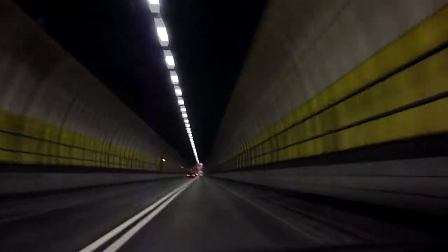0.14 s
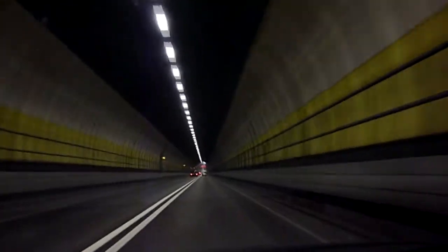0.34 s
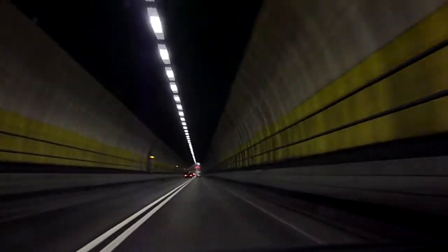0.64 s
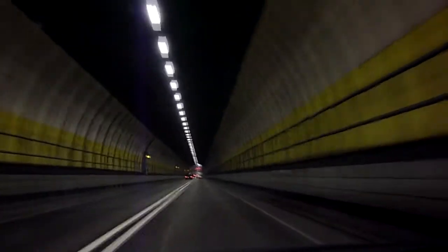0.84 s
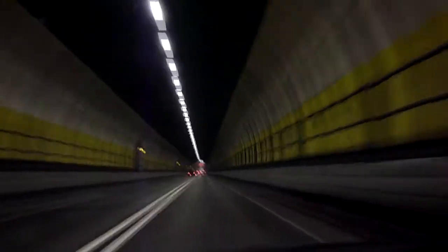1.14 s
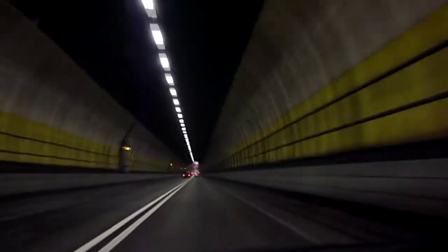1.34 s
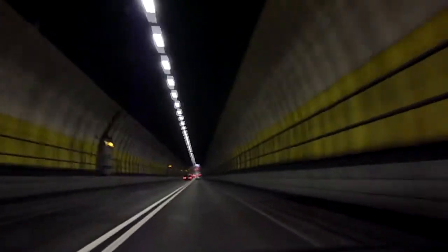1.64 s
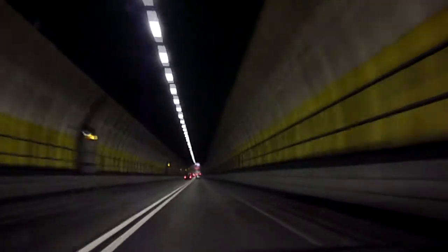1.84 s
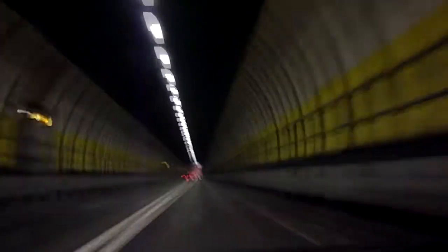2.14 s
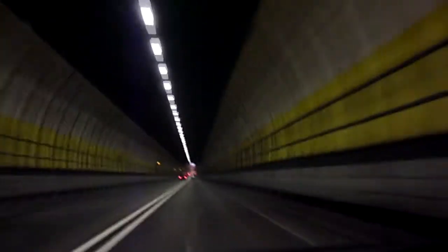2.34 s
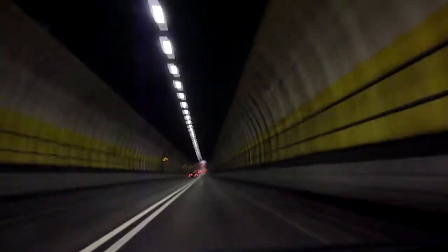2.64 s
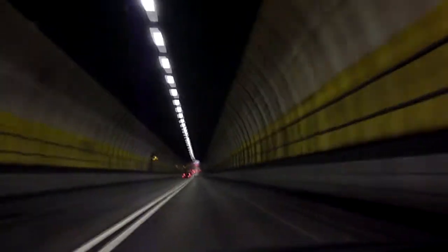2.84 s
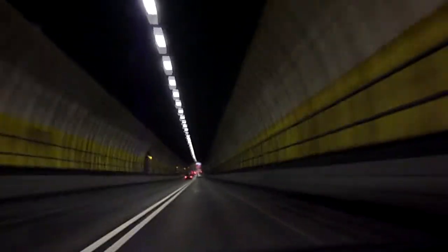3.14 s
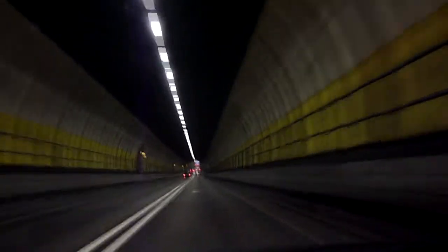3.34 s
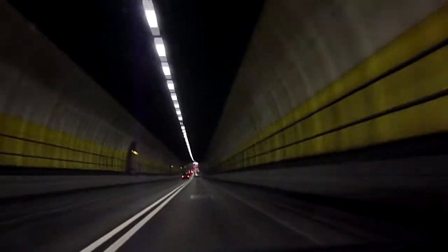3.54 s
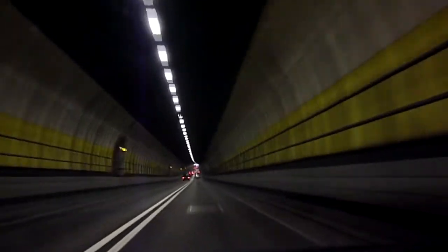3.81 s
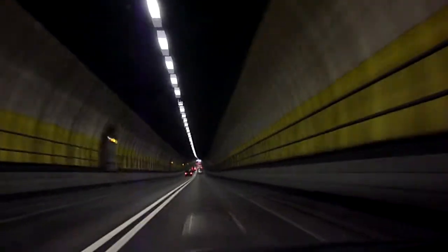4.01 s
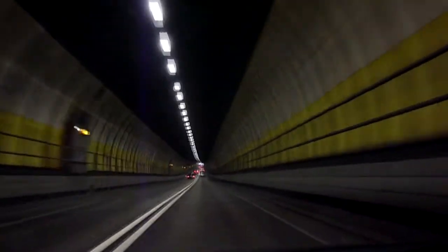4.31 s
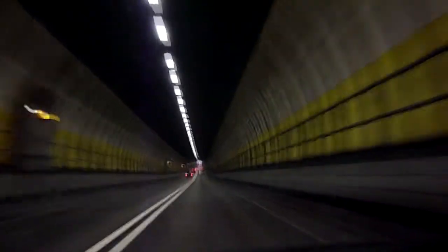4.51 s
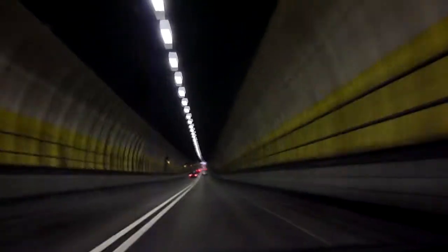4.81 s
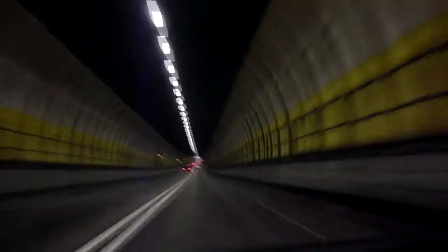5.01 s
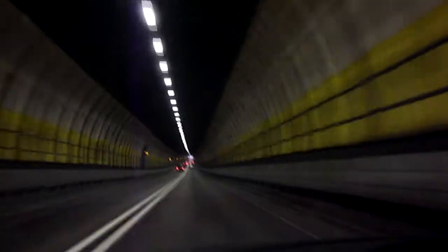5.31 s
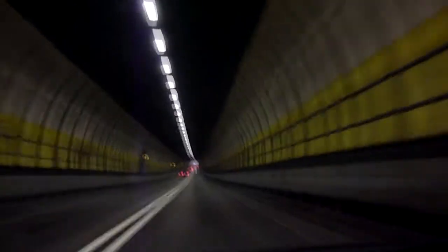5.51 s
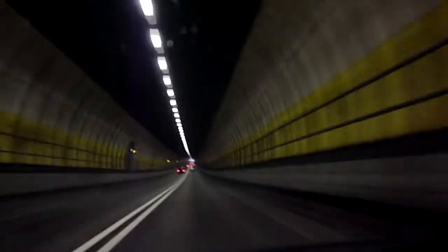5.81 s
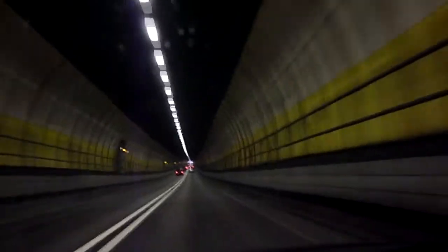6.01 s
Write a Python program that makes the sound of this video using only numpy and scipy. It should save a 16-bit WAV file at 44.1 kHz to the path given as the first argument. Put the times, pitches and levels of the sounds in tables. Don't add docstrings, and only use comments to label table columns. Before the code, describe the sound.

Constant low cabin boom and dull tread roar as a car cruises through a tunnel, with brief swelling hums and tiny plastic rattles.

```python
import sys
import numpy as np
from scipy import signal
from scipy.io import wavfile
from scipy.ndimage import uniform_filter1d

SR = 44100
rng = np.random.default_rng(int(sys.argv[2]) if len(sys.argv) > 2 else 0)


def transcribe(signal):
    frames = np.atleast_2d(signal).T
    limited = np.clip(frames, -1, 1)
    pcm = np.round(limited * 32767).astype(np.int16)
    wavfile.write(sys.argv[1], SR, pcm)


def gain_from_decibels(decibels):
    exponent = np.asarray(decibels, float) / 20
    return 10 ** exponent


N = 271656


def evened(x):
    return x / np.sqrt(np.mean(x ** 2) + 1e-20)


def curve(rows):
    s, db = np.transpose(rows)
    return np.interp(np.arange(N) / SR, s, db)


def swells(rows):
    s, db, length = np.transpose(rows)[:, :, None]
    t = np.arange(0, N + 256, 256) / SR
    bumps = db * np.exp(-((t - s) / length) ** 2)
    return np.interp(np.arange(N) / SR, t, bumps.max(axis=0))


def steadied(x, size, share):
    power = uniform_filter1d(uniform_filter1d(x ** 2, size=size), size=size)
    return evened(x / (power + 1e-6) ** (share / 2))


def coloured(points, patchy_db=0., flicker_db=0., size=1024):
    hop = size // 4
    hz = np.fft.rfftfreq(size, 1 / SR)
    frames = N // hop + 5
    a, b, patches = rng.standard_normal((frames, len(hz), 3)).T
    patches = uniform_filter1d(patches, size=10, axis=0)
    patches = evened(uniform_filter1d(patches, size=12, axis=1))
    flicker = evened(uniform_filter1d(rng.standard_normal(frames), size=4))
    f, db = np.transpose(points)
    colour_db = np.interp(np.log(hz + 1), np.log(f + 1), db, left=-100, right=-100)
    z = (a + 1j * b) * gain_from_decibels(colour_db[:, None] + patchy_db * patches + flicker_db * flicker)
    return evened(signal.istft(z, nperseg=size, noverlap=size - hop)[1][:N])


def ringing(hz, width_hz):
    r = np.exp(-np.pi * width_hz / SR)
    slow = rng.standard_normal(N) + 1j * rng.standard_normal(N)
    slow = signal.lfilter([1], np.convolve([1, -r], [1, -r]), slow)
    return evened((slow * np.exp(2j * np.pi * hz * np.arange(N) / SR)).real)


# t/s, level/dB
WALL_ROAR = [(0, -27), (.2, -28.5), (.42, -27), (.9, -28.5), (1.1, -30.5), (1.38, -27.5), (2.2, -31.5),
             (2.69, -27), (3.33, -29), (3.55, -27), (3.8, -26.5), (3.98, -30), (4.08, -26.5), (4.6, -27),
             (4.72, -29), (5.0, -28.5), (5.5, -26), (6.16, -26.5)]


def roar_db():
    return curve(WALL_ROAR)


def with_roar(share):
    mean_db = -28.5
    return gain_from_decibels(share * (roar_db() - mean_db))


# f/Hz, level/dB
WIND_COLOUR = [(1800, -30), (2600, -1.5), (3500, 0.5), (4400, -5), (5400, -8), (6500, -8.5), (8100, -11.5)]


def wind():
    hiss = coloured(WIND_COLOUR, patchy_db=0.9, flicker_db=.6, size=512)
    return gain_from_decibels(-57.5) * with_roar(1.2) * hiss


# t/s, peak level/dB
TRIM_TICKS = [(0.2374, -59), (1.1872, -54), (1.4044, -55), (1.7225, -60), (2.1161, -55), (2.157, -47),
              (2.1744, -57), (2.2233, -50), (2.2573, -55), (2.2932, -47), (2.3115, -56), (2.4144, -58),
              (2.9734, -55.5), (3.0374, -55), (3.0869, -48.5), (3.1916, -57), (3.5059, -60), (4.6164, -49),
              (4.9377, -58), (5.0649, -57), (5.1552, -40.5), (5.1954, -58), (5.234, -55), (5.2454, -55),
              (5.6654, -57), (5.7463, -51), (5.7514, -49), (5.8167, -55), (5.8476, -54)]


def tick_envelope():
    t = np.arange(3000) / SR
    envelope = np.zeros(N + 3000)
    stutter = 0.9 + .4 * np.cos(2 * np.pi * 420. * t)
    tail = gain_from_decibels(-10 - 60 * t / 0.087)
    onset = np.minimum(t / .0004, 1)
    for s, db in TRIM_TICKS:
        scrape_s = .002 + .0004 * max(db + 50, 0)
        scrape = np.clip((scrape_s - t) / .001 + 1, 0, 1) * stutter
        envelope[round(s * SR):][:len(t)] += gain_from_decibels(db - 3.0) * (scrape + tail) * onset
    return envelope[:N]


# t/s, level over the steady buzz/dB, length/s
LOOSE_SPELLS = [
    (1.2, 1.5, .15),
    (2.22, 4, .13),
    (3.1, 4.5, .12),
    (4.6, 2.5, .05),
    (5.22, 3, .07),
    (5.67, 4, .02),
    (5.8, 2, .07),
]


def buzz_envelope():
    loose_db = swells(LOOSE_SPELLS)
    slips_per_s = 100. * gain_from_decibels(3. * loose_db)
    strength = gain_from_decibels(4. * np.minimum(rng.exponential(1, N), 4))
    slips = strength * (rng.random(N) < slips_per_s / SR)
    decay = gain_from_decibels(-60 * np.arange(800) / SR / .015)
    slips = signal.oaconvolve(slips, decay)[:N]
    return gain_from_decibels(-70 + loose_db) * with_roar(.5) * evened(1 + .15 * slips)


# f/Hz, level/dB
TRIM_COLOUR = [(2500, -26), (4000, -9.5), (5300, -2), (6500, 1), (8100, -5.5)]


def trim():
    plastic = steadied(coloured(TRIM_COLOUR, size=256), size=40, share=.6)
    return np.hypot(tick_envelope(), buzz_envelope()) * plastic


# f/Hz, level/dB
TREAD_COLOUR = [(220, -32.5), (380, -5.5), (478, -5), (984, -5), (2310, -28.5), (2700, -31), (3510, -70.5),
                (5940, -120)]


def tread_roar():
    roar = coloured(TREAD_COLOUR, patchy_db=0.26, flicker_db=1.15)
    return gain_from_decibels(roar_db()) * steadied(roar, size=6000, share=0.66)


# t/s, level over the steady hum/dB, length/s
RIBBED_ROAD = [(.3, 7.5, 0.23), (.56, 12, 0.074), (.8, 10, 0.093), (1.43, 11.5, 0.19), (1.65, 12, 0.12),
               (2.02, 11, 0.17), (2.4, 9, .15), (2.81, 6, .08), (3.05, 13.5, 0.22), (3.3, 13.5, 0.089),
               (3.68, 11, 0.29), (4.0, 7.5, 0.17), (4.58, 10.5, .1), (5.0, 12.5, 0.34), (5.23, 15, 0.13),
               (5.5, 10.5, 0.13), (5.8, 6, 0.17), (6.14, 12, .1)]


def tyre_hum():
    air_ring = ringing(253, width_hz=8.2)
    return gain_from_decibels(-36.5 + swells(RIBBED_ROAD)) * steadied(air_ring, size=3000, share=.8)


# t/s, level over the steady heave/dB, length/s
ROAD_DIPS = [
    (.3, 3.5, 0.26),
    (1., 4, 0.17),
    (2.1, 3.5, 0.31),
    (2.33, 5, 0.13),
    (3.35, 3, 0.32),
    (4.1, 3, 0.12),
    (4.5, 6, 0.18),
    (4.9, 2.5, 0.13),
    (5.4, 3, 0.28),
    (5.87, 2.5, .15),
]
# f/Hz, level/dB
HEAVE_COLOUR = [(8, -32.5), (20, -21.5), (32, -4), (42, -4.5), (49, -0.5), (57, -1.5), (64, -3.5),
                (73, -5.5), (95, -10.5), (130, -32)]


def heave():
    rocking = steadied(coloured(HEAVE_COLOUR, size=8192), size=5000, share=0.53)
    return gain_from_decibels(-33.5 + swells(ROAD_DIPS)) * rocking


# t/s, level/dB
ROAD_SHAKE = [(0, -18), (.2, -17.5), (.4, -18.5), (.55, -17), (.75, -18), (1., -17), (1.3, -18.5),
              (1.7, -16.5), (2.3, -17), (2.55, -20.5), (3.09, -16), (3.55, -19.5), (3.9, -16), (4.2, -18.5),
              (4.58, -16), (5.25, -20), (5.68, -18), (6.16, -19)]
# f/Hz, level/dB
PANEL_COLOUR = [(45, -40), (72, -15.5), (110, -5.5), (150, 0), (200, -3.5), (250, -7.5), (268, -14),
                (285, -12), (350, -14.5), (430, -22.5), (520, -35.5), (680, -47), (1100, -100)]
# f/Hz, width/Hz, level/dB
CABIN_MODES = [(148, 13, -8), (177.8, 12, -11), (211.4, 14, -13.5), (343.7, 25, -25.5)]


def boom():
    body = coloured(PANEL_COLOUR, size=8192)
    for hz, width_hz, db in CABIN_MODES:
        body = body + gain_from_decibels(db) * ringing(hz, width_hz)
    low = signal.sosfiltfilt(signal.butter(4, 165, fs=SR, output="sos"), body)
    low_and_mid = signal.sosfiltfilt(signal.butter(4, 262, fs=SR, output="sos"), body)
    shake_db = curve(ROAD_SHAKE)
    floor_pan = gain_from_decibels(shake_db - 4) * steadied(low, size=5000, share=0.52)
    roof = gain_from_decibels(0.86 * shake_db - 8.5) * steadied(low_and_mid - low, size=5000, share=0.55)
    small_panels = gain_from_decibels(-29.5) * with_roar(.8) * steadied(body - low_and_mid, size=4000, share=0.33)
    return floor_pan + roof + small_panels


def scene():
    return (wind() + trim() + tread_roar() + tyre_hum() + heave() + boom())[None]


CAMERA_RATE = 16000


def settled(b, a, x):
    return signal.lfilter(b, a, x, zi=signal.lfilter_zi(b, a) * x[0])[0]


# f/Hz, width/Hz
INPUT_NOTCHES = [(3004, 500), (4398, 900)]


def input_filter(x):
    for hz, width_hz in INPUT_NOTCHES:
        r = np.exp(-np.pi * width_hz / CAMERA_RATE)
        c = np.cos(2 * np.pi * hz / CAMERA_RATE)
        x = settled(np.array([1, -2 * c, 1]) * (1 + r) ** 2 / 4, [1, -2 * r * c, r * r], x)
    r = np.exp(-np.pi * 600 / CAMERA_RATE)
    return settled(np.array([1, 1]) * (1 + r) / 2, [1, r], x)


# f/Hz, level/dB
CIRCUIT_TONES = [(6222, -86), (7917, -88.5)]


def circuit_whine(count):
    t = np.arange(count) / CAMERA_RATE
    return sum(gain_from_decibels(db) * np.sin(2 * np.pi * hz * t) for hz, db in CIRCUIT_TONES)


def band_limit(x):
    return signal.sosfilt(signal.butter(12, 15100, fs=SR, output="sos"), x)


def record(dry):
    count = N * CAMERA_RATE // SR
    mirrored = np.append(dry[0], dry[0, ::-1])
    x = input_filter(signal.resample(mirrored, 2 * count)[:count])
    x = x + circuit_whine(count)
    y = np.interp(np.arange(N) / SR, np.arange(count) / CAMERA_RATE, x)
    y = signal.sosfiltfilt(signal.butter(2, 8200., fs=SR, output="sos"), y)
    y = y + gain_from_decibels(-97) * rng.standard_normal(N)
    y = y - .0523
    y = y * np.minimum(np.arange(N, 0, -1) / 150, 1)
    opening = .11
    y = y + (opening - y[0]) * np.exp(-(np.arange(N) / 60) ** 2)
    return band_limit(y[None])


dry = scene()
out = record(dry)
transcribe(out)
```